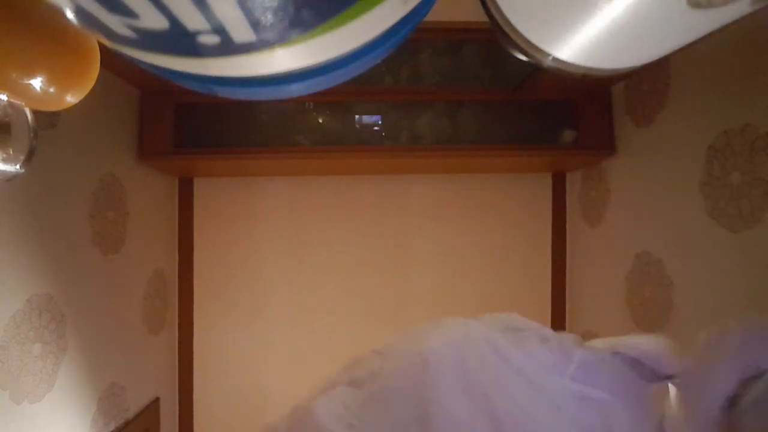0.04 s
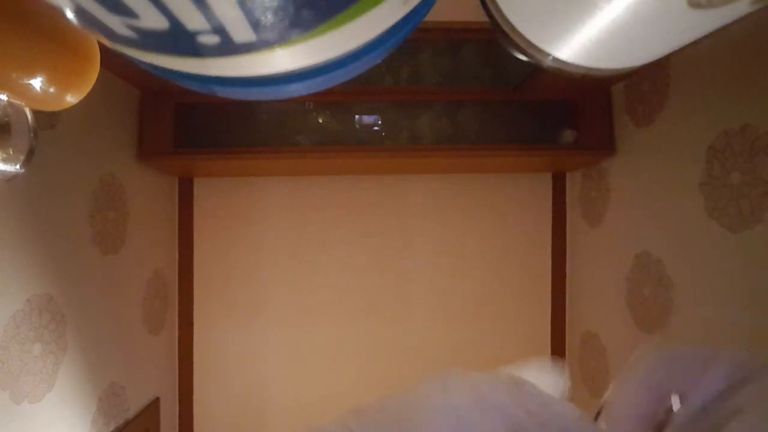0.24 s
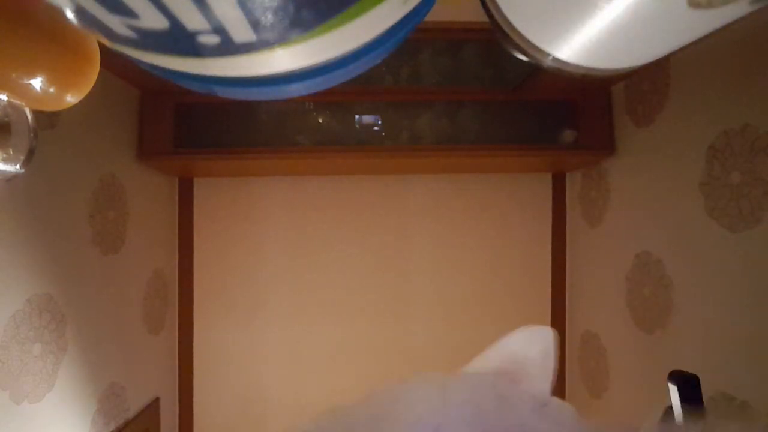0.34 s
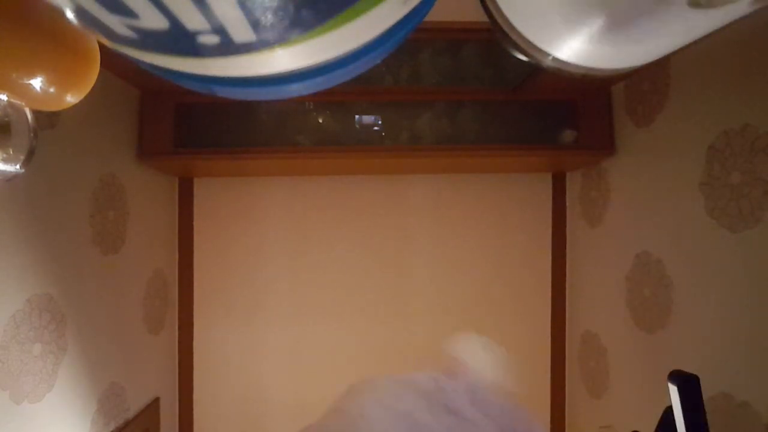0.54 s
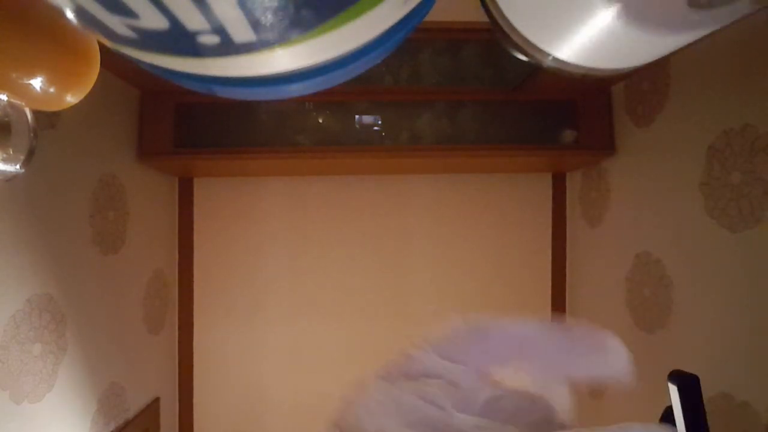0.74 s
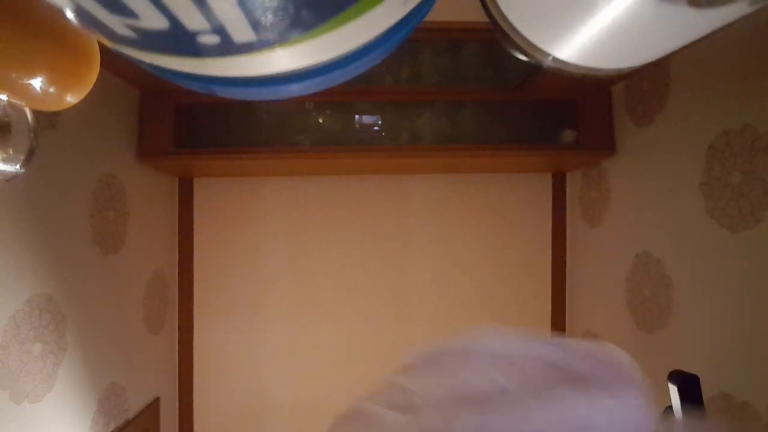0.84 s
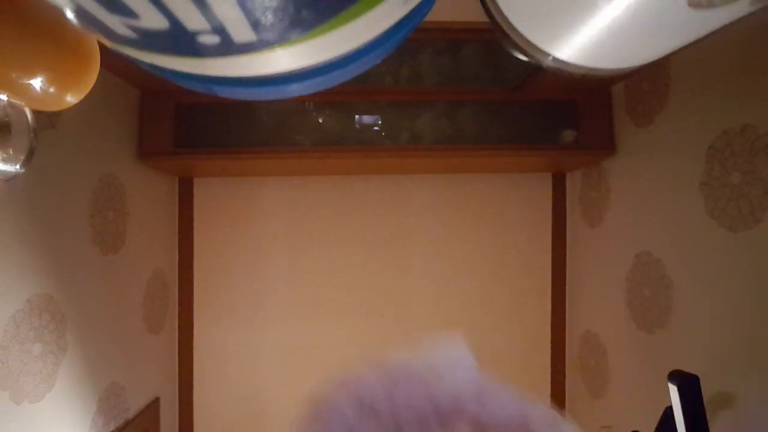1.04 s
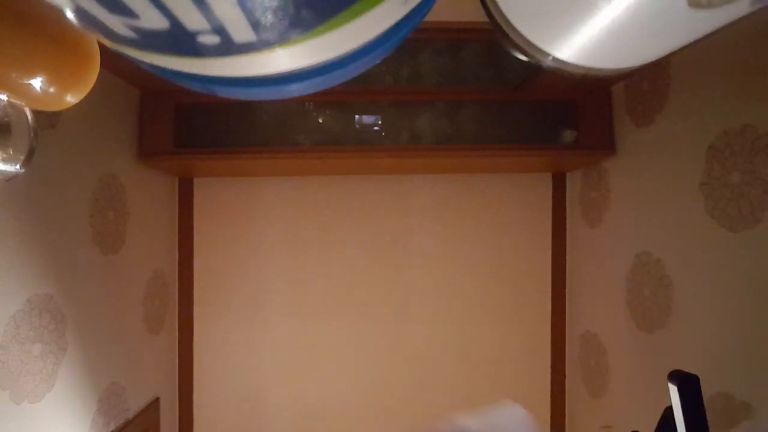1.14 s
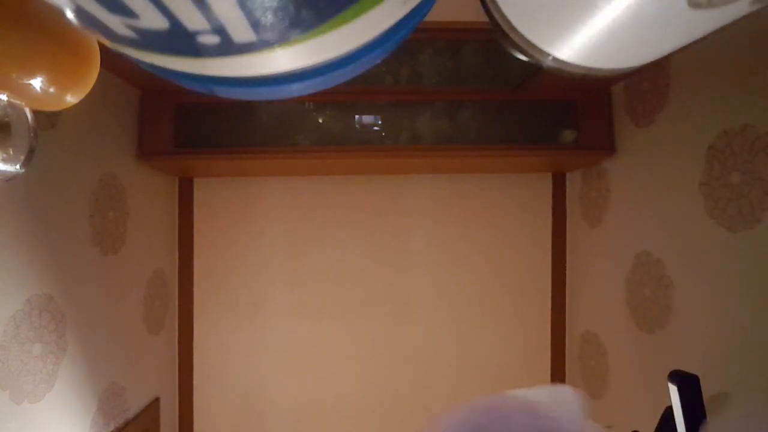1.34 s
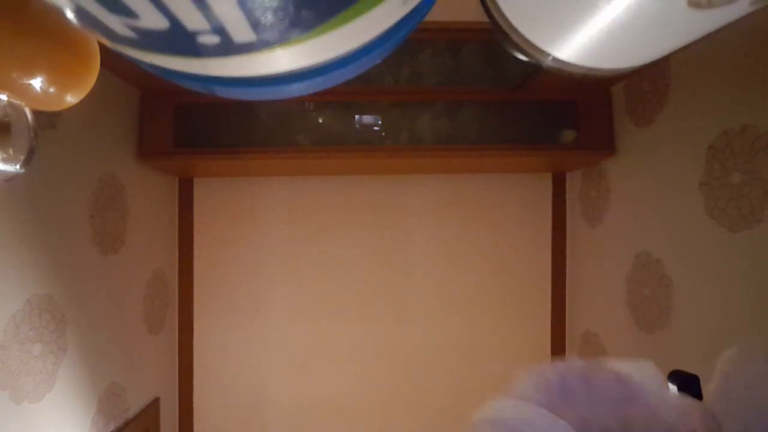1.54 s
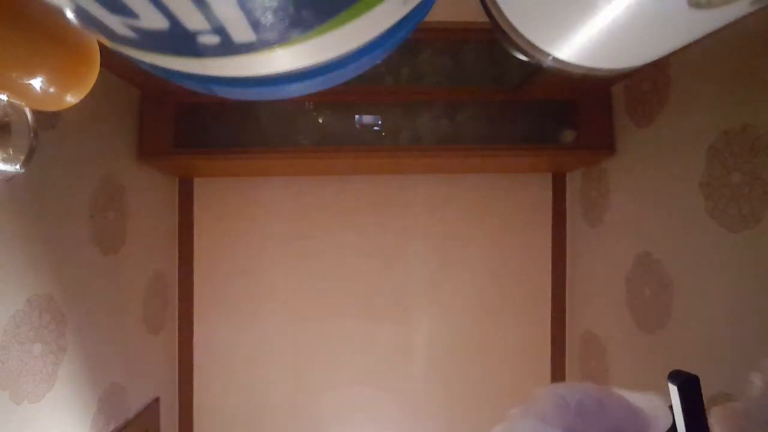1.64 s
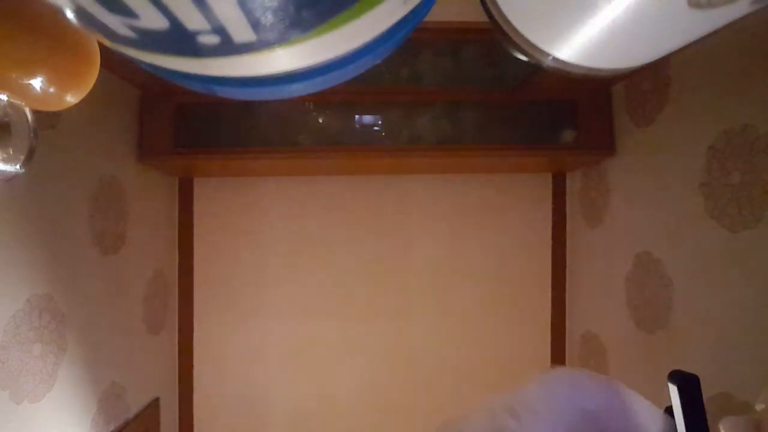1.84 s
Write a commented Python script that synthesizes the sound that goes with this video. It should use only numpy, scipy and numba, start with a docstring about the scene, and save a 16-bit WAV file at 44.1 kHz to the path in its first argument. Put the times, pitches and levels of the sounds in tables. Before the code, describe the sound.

Gloved fingers twist and snap a thread beside the microphone, with ticks and filmy rustles

```python
"""Gloved hands snapping a thread

Gloved hands twist and snap a thread just beside a small stereo microphone in a papered alcove.
Ticks, snaps, glove-film rustles and soft finger bumps are built from short rings that swell and die;
the sliding glove and the faint room are coloured noise. Near walls add a short, dull echo.
"""
import sys
import numpy as np
from scipy import signal
from scipy.fft import rfft, irfft
from scipy.io import wavfile
from scipy.ndimage import uniform_filter1d
from numba import njit

SR = 44100
rng = np.random.default_rng(int(sys.argv[2]) if len(sys.argv) > 2 else 0)


def store_wav(level_fs):
    """Save 16-bit WAV to argv[1]."""
    pcm = np.round(np.clip(np.atleast_2d(level_fs), -1, 1) * 32767)
    wavfile.write(sys.argv[1], SR, pcm.T.astype(np.int16))


def natural_amplitude(level_db):
    """Convert a level in decibels to a linear amplitude factor, elementwise."""
    exponent = np.asarray(level_db, float) / 20
    return 10 ** exponent


N = 83790  # length of the scene in samples
LEFT_LAG_S = 0.00015  # the usual delay of the left port


@njit
def add_rings(out, start, hz, cycles, size):
    """Each grain is a ring that swells for a third of its cycles and dies away."""
    for k in range(len(start)):
        turn = 2 * np.pi * hz[k] / SR  # radians per sample
        swell = cycles[k] / 3 * SR / hz[k]  # samples
        for i in range(min(int(9 * swell), len(out) - start[k])):
            envelope = i / swell * np.exp(1 - i / swell)
            out[start[k] + i] += size[k] * envelope * np.sin(turn * i)


def grains(s, hz, cycles, size, pan_db, lag_s):
    """Rings heard by both ports: pan_db is left minus right, lag_s delays the left one."""
    out, one = np.zeros((2, N)), np.ones(len(s))
    for port, side in enumerate((1, -1)):
        lag = lag_s * (1 - port)
        start = np.clip((s + lag) * SR, 0, N - 1).astype(np.int64)
        port_size = size * natural_amplitude(side * pan_db / 2) * one
        add_rings(out[port], start, np.clip(hz * one, 30, .4 * SR), cycles * one, port_size)
    return out


def noise(tone):
    """Two unrelated random noises of one colour, scaled together to rms 1."""
    hz, db = np.array(tone, float).T
    f = np.arange(N // 2 + 1) * SR / N + 1
    colour = natural_amplitude(np.interp(np.log(f), np.log(hz), db))
    x = irfft(rfft(rng.standard_normal((2, N))) * colour, N)
    return x / x.std()


# colour of the room noise: (frequency [Hz], relative level per Hz [dB])
ROOM_TONE = [(25, -21), (40, -2.5), (80, 5), (160, -1.5), (500, -4), (1000, -8), (2600, -15), (4400, -20),
             (12000, -36.5), (16000, -27)]


def room():
    """Steady room noise; the two ports share most of the bass and differ more higher up."""
    level_db, alike_below_hz = -66.5, 730
    mid, side = noise(ROOM_TONE)
    high_pass = signal.butter(1, alike_below_hz, "high", fs=SR, output="sos")
    # a weaker, time-shifted copy of the middle keeps some bass difference
    side = signal.sosfilt(high_pass, side) + 0.39 * np.roll(mid, N // 2)
    return natural_amplitude(level_db) * np.array([mid + side, mid - side])


# how loud the sliding glove hisses: (time [s], level before flicker [dB])
SLIDE_LEVEL = [(0, -58.5), (.04, -55.5), (.08, -62.5), (.135, -55), (.19, -58.5), (.22, -47.5),
               (.26, -59.5), (.31, -57.5), (.35, -61.5), (.43, -60), (.55, -63), (.61, -66.5), (0.641, -59),
               (0.711, -55.5), (.77, -55.5), (.81, -61), (.855, -61), (.88, -50.5), (0.958, -52.5),
               (.985, -63), (1.1, -63.5), (1.17, -62), (1.21, -65.5), (1.3, -70.5), (1.35, -62.5),
               (1.39, -66), (1.435, -58.5), (1.5, -57.5), (1.72, -55), (1.8, -57.5), (1.9, -58.5)]
# colour of that hiss: (frequency [Hz], relative level per Hz [dB])
SLIDE_TONE = [(500, -20), (1000, -17), (2200, -3.5), (4300, -8), (5300, -10), (6500, -13), (8400, -6),
              (9700, -17.5), (12000, -13.5), (15000, -15.5), (15700, -24)]


def slide():
    """Fine hiss whose level follows the sliding glove and flickers a little."""
    flicker_db, step = 1.6, 400  # step in samples
    s, db = np.array(SLIDE_LEVEL, float).T
    flicker = np.repeat(rng.standard_normal(N // step + 1), step)
    flicker = uniform_filter1d(flicker, step)[:N]
    level_db = np.interp(np.arange(N) / SR, s, db) + flicker_db * flicker
    return noise(SLIDE_TONE) * natural_amplitude(level_db)


# soft finger bumps: (time [s], level of each part before fading [dB], pitch before scatter [Hz])
FINGER_BUMPS = [(0.035, -52, 173), (0.203, -53.5, 237), (0.324, -58.5, 148), (0.492, -61, 88.6),
                (0.698, -58, 276), (0.864, -72, 208), (0.93, -58, 140), (1.346, -57, 158),
                (1.501, -47, 228), (1.51, -53, 122), (1.638, -58, 192), (1.717, -55, 173)]


def bumps():
    """Low soft thuds in a few uneven parts, nearly alike on both ports."""
    parts, spread_s, cycles, scatter_octaves = 3, 0.00785, 1.7, .6
    s, db, hz = np.repeat(np.array(FINGER_BUMPS, float), parts, axis=0).T
    jitter, tone, pan, lag = rng.random((len(s), 4)).T
    late = (np.arange(len(s)) % parts + jitter - .5) / parts
    part_hz = hz * 2 ** (scatter_octaves * (tone - .5))
    size = natural_amplitude(db - 2.2 * late)  # later parts are softer
    return grains(s + spread_s * late, part_hz, cycles, size, 6 * (pan - .4), 0.0012 * (lag - .5))


# rustles of the glove film:
# (middle time [s], half length [s], biggest crease before tilt [dB], centre pitch [Hz])
FILM_RUSTLES = [(0.041, 0.051, -46.5, 2320), (0.142, 0.056, -49.5, 1400), (0.2, 0.061, -64, 2520),
                (0.272, 0.041, -51.5, 1550), (0.322, 0.033, -50.5, 2100), (0.421, 0.041, -58.5, 2070),
                (0.486, 0.061, -50.5, 2320), (0.576, 0.035, -70, 1230), (0.701, 0.032, -44.5, 2270),
                (0.759, 0.045, -51.5, 1730), (0.826, 0.043, -62.5, 1190), (0.876, 0.021, -35, 3200),
                (0.897, 0.02, -36.5, 2870), (0.927, 0.023, -36.5, 2000), (0.954, 0.042, -45, 2700),
                (1.226, .06, -62, 1210), (1.267, 0.032, -65, 1550), (1.354, 0.036, -59.5, 1420),
                (1.447, 0.046, -52, 1910), (1.513, 0.031, -46.5, 1610), (1.584, 0.046, -50.5, 1390),
                (1.629, 0.039, -48.5, 1810), (1.718, 0.047, -47, 1690)]


def rustles():
    """Dense creases, each a very short ring of uneven size, under a smooth swell."""
    creases_per_s, cycles, widest_octaves = 2600, 1.25, 2
    spread_db, biggest = 3, 3.2  # crease sizes are capped at this many spreads
    tilt_db = 1.5  # per octave: low creases are smaller
    rows = []
    for mid, half_length, db, hz in FILM_RUSTLES:
        u = rng.random((int(creases_per_s * 2 * half_length), 7)).T
        place = 2 * u[0] - 1  # -1 at the start of the rustle, 1 at its end
        big = np.minimum(-np.log(1 - u[1]), biggest)  # many small creases, few big ones
        octaves = widest_octaves * (u[2] + u[3] - 1)
        size = natural_amplitude(db + spread_db * (big - biggest) + tilt_db * octaves)
        swell = np.cos(np.pi / 2 * place) ** 2
        sign = np.sign(u[4] - .5)
        pan_db = 11 + 8 * (u[5] - .5)
        lag_s = LEFT_LAG_S * (3 * u[6] - 1)
        rows.append([mid + half_length * place, hz * 2 ** octaves, size * swell * sign, pan_db, lag_s])
    s, hz, size, pan_db, lag_s = np.concatenate(rows, axis=1)
    return grains(s, hz, cycles, size, pan_db, lag_s)


# ticks of thread and glove: (time [s], ring level [dB], ring pitch [Hz],
# body relative to ring [dB], crack relative to ring [dB], ring left minus right [dB])
THREAD_TICKS = [(0.0274, -42, 2720, -4, -24, 9), (0.0368, -28.5, 3420, -17, -15, -11),
                (0.0529, -48, 2280, 2.5, -16, 8), (0.1215, -45, 2100, -17, -20, 12),
                (0.2795, -39, 2030, -8, -19, -2), (0.3102, -27, 2760, -22.5, -4.5, 2.5),
                (0.3146, -40.5, 2170, -0.5, -15, 24.5), (0.34, -43.5, 2630, -9, -16, -1),
                (0.4045, -43.5, 2220, -9, -15, 9), (0.4879, -43, 4150, -4.5, -36, 13.5),
                (0.5897, -46.5, 1960, -30, -12, 11), (0.6548, -38.5, 3600, -13, -22, -1),
                (0.6775, -38, 3220, -3.5, -14, -9), (0.6984, -38.5, 2980, -24, -23, 20),
                (0.7014, -32.5, 3100, -1, -31, -12), (0.7161, -37.5, 2330, -8, -23, 15),
                (0.7685, -44, 2450, -17, 0, 19), (0.7774, -32.5, 2100, -12.5, 1.5, 8),
                (0.8147, -61, 1670, 11, -1, 9), (0.8388, -52, 2200, 6, -6, 12),
                (0.8518, -44.5, 2530, -2, -17, 17), (0.8928, -31, 2960, -19, -12, 16),
                (0.8933, -27.5, 3180, -13, 0, -2), (0.8971, -34.5, 3160, -33, -15, -13),
                (0.9, -37, 2300, 3, -14, -24), (0.9208, -40.5, 2520, 2, -9, 15),
                (0.9298, -38.5, 1800, 2.5, -4, -10), (0.9517, -34.5, 2270, -7.5, -1, 3),
                (1.1199, -56, 1970, 2, -10, 13), (1.1234, -47.5, 1690, -7.5, -17, 5),
                (1.1538, -51, 2340, -2, -8, 17), (1.1896, -47.5, 2090, -3.5, 0, 16),
                (1.2466, -47.5, 2340, -1, -10, 12), (1.2517, -57, 1700, -1, 0, 15),
                (1.272, -45.5, 2580, -11, -7, -10), (1.2873, -53, 1880, 8.5, -20, 26.5),
                (1.351, -55, 2100, 9, -12, 18), (1.3592, -53, 2120, 0, -34, 21),
                (1.387, -50, 2160, -1.5, -18, 20), (1.4389, -48, 2140, 0, 3, 17),
                (1.4508, -45.5, 1830, -2.5, -23, 16), (1.479, -40, 2110, -11, -18, -4),
                (1.5026, -41.5, 2030, -2, -0.5, 27.5), (1.5282, -36, 2560, -11, -14.5, 7),
                (1.546, -39, 2040, -20, -16, 5), (1.5867, -45, 2140, 4, -17, 10),
                (1.6044, -39, 2050, -11, -25.5, 9), (1.6225, -33, 1860, -1.5, -25, 1),
                (1.6436, -23, 2310, -22, -19.5, 7), (1.655, -50, 1840, 6, -4, 1),
                (1.682, -50.5, 1900, 1, -9, 4), (1.7179, -36.5, 1940, -6.5, -2, 7),
                (1.7242, -36, 2400, -11, -9, 7), (1.7858, -37, 2050, -17, -16, 10),
                (1.8174, -43, 2000, -24, -10, 7), (1.835, -38.5, 2080, -15, -20, 7),
                (1.8703, -44, 2220, -36, -13.5, 12), (1.8802, -52.5, 2120, -4, -17, 13)]


def ticks():
    """A slip rings briefly, with a duller body and a bright crack; smaller slips splinter after it."""
    ring_cycles, body_hz, body_cycles = 1.82, 850, 0.68
    crack_hz, crack_cycles = 8400, 2.8  # crack pitch before scatter
    between_db = -6  # for a partial midway between body and ring
    splinters, splinter_s, scatter_octaves = 3, .0012, .6
    splinter_db, loud_db = -11, -25  # splinter relative to its tick, for a tick at loud_db
    fainter_per_db = 0.9  # weak ticks splinter less
    s, db, hz, body_db, crack_db, pan_db = np.array(THREAD_TICKS, float).T

    body_size = -natural_amplitude(db + body_db)
    out = grains(s, body_hz, body_cycles, body_size, pan_db / 2, LEFT_LAG_S / 2)
    between_size = -natural_amplitude(db + body_db / 2 + between_db)
    out += grains(s, np.sqrt(hz * body_hz), ring_cycles, between_size, pan_db / 2, LEFT_LAG_S)

    chance = rng.random((len(s), splinters + 1, 3))
    for k in range(splinters + 1):  # 0 is the tick itself
        late, detune, sign = chance[:, k].T
        if k == 0:
            at, ring_hz, size = s, hz, -natural_amplitude(db)
        else:
            at = s + splinter_s * (k + late) / (splinters + 1)
            ring_hz = hz * 2 ** (scatter_octaves * (detune - .5))
            drop_db = splinter_db + fainter_per_db * (db - loud_db)
            size = natural_amplitude(db + drop_db) * np.sign(sign - .5)
        out += grains(at, ring_hz, ring_cycles, size, pan_db, LEFT_LAG_S)
        bright_hz = crack_hz * 2 ** (1.7 * detune - .4)
        out += grains(at, bright_hz, crack_cycles, size * natural_amplitude(crack_db), 0, LEFT_LAG_S * late)
    return out


# the thread lets go: (time [s], level [dB], left minus right [dB], tilt [dB per octave])
THREAD_SNAPS = [(0.2055, -15.5, 2, 0), (0.8676, -26.5, -3.5, 2)]
# what a snap rings: (pitch [Hz], length [cycles], relative level [dB], added left minus right [dB])
SNAP_MODES = [(584, 1.54, -11.5, -0.5), (1046, 2.7, -7, 6.5), (1697, 3.6, -7, -2.5), (2100, 2.68, -5.5, 8),
              (2620, 2.53, 0, 11), (4030, 7.2, -2.5, 8.5), (4610, 6.3, -11, -0.5), (6500, 9.2, -20.5, 4),
              (8340, 10.7, -17, 6), (11000, 6.4, -11, -4), (13700, 6.1, -14, 2)]


def snaps():
    """Each snap rings the same few short modes at once; a tighter thread is brighter."""
    hz, cycles, mode_db, mode_pan_db = np.array(SNAP_MODES, float).T
    out = np.zeros((2, N))
    for s, db, pan_db, tilt_db in THREAD_SNAPS:
        size = -natural_amplitude(db + mode_db + tilt_db * np.log2(hz / 850))  # the tilt pivots at 850 Hz
        out += grains(s + 0 * hz, hz, cycles, size, pan_db + mode_pan_db, LEFT_LAG_S)
    return out


def alcove(x):
    """The near walls answer with a short dull noise tail, different on each port."""
    t60_s, dull_above_hz, first_wall_s = 0.069, 6000, 0.0039  # t60: time to fall by 60 dB
    t = np.arange(int(.25 * SR)) / SR
    tail = rng.standard_normal((2, len(t))) * natural_amplitude(-60 * t / t60_s) * (t > first_wall_s)
    tail = signal.sosfilt(signal.butter(1, dull_above_hz, fs=SR, output="sos"), tail)
    tail = tail / np.sqrt(np.sum(tail ** 2) / 2)
    return signal.fftconvolve(x, tail, axes=1)[:, :N]


def share_ports(x):
    """Some of each port's sound also reaches the other one."""
    cross = 0.25
    return (x + cross * x[::-1]) / (1 + cross)


# microphone colour, three resonances then two dips: (centre [Hz], width [Hz], strength [dB])
CAPSULE = [(4430, 340, -1), (8530, 1500, 2), (3010, 510, -11.5), (6540, 630, -17), (3150, 160, -30)]


def microphone(x):
    """The capsule loses the lowest bass, boosts three narrow bands and weakens two."""
    x = signal.sosfilt(signal.butter(2, 106, "high", fs=SR, output="sos"), x)
    for k, (hz, width_hz, db) in enumerate(CAPSULE):
        band = signal.lfilter(*signal.iirpeak(hz, hz / width_hz, fs=SR), x)
        sign = 1 if k < 3 else -1
        x = x + sign * natural_amplitude(db) * band
    return x


def scene():
    """Thread and film sounds with their echo pass the microphone; bumps, hiss and room join them."""
    snap_echo_db, small_echo_db = -13.5, -16.5  # ticks are muffled inside the hands
    snap = snaps()
    small = ticks() + rustles()
    direct = share_ports(snap + small)
    echo = alcove(natural_amplitude(snap_echo_db) * snap + natural_amplitude(small_echo_db) * small)
    return microphone(direct + echo) + bumps() + slide() + room()


def roll_off(x):
    """The treble ends steeply here."""
    return signal.sosfilt(signal.butter(12, 16800, fs=SR, output="sos"), x)


def record(dry):
    """The recorder cuts the top of the treble."""
    top_cut = signal.cheby1(4, 1, 15500, fs=SR, output="sos")  # 1 dB ripple, 15500 Hz edge
    mix = signal.sosfilt(top_cut, dry)
    return roll_off(mix)


dry = scene()
out = record(dry)
store_wav(out)
```